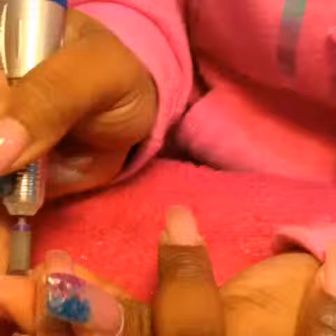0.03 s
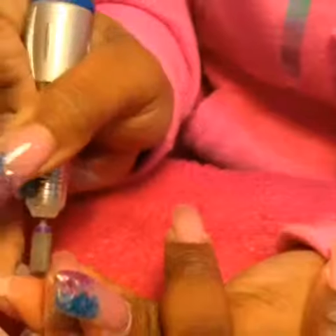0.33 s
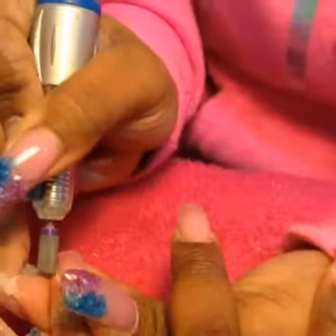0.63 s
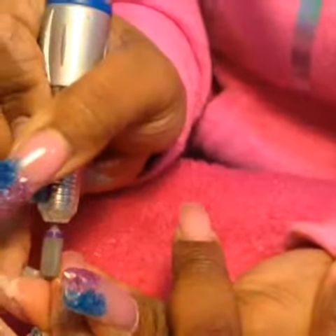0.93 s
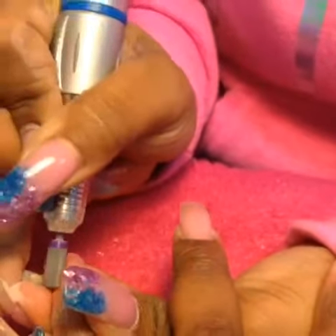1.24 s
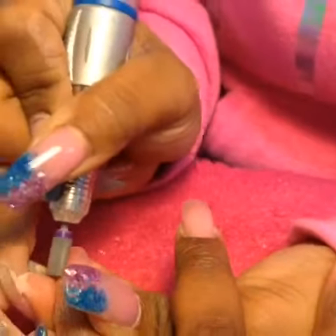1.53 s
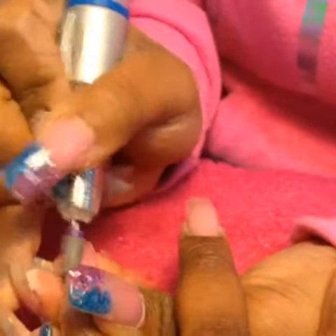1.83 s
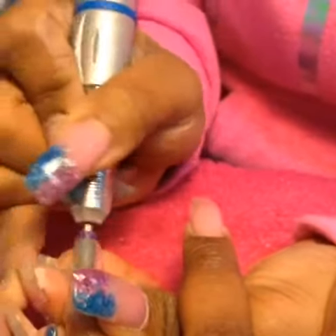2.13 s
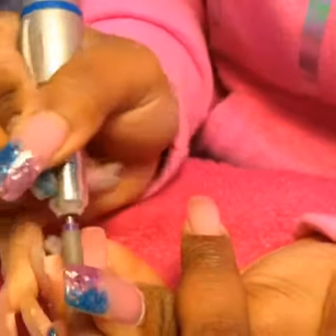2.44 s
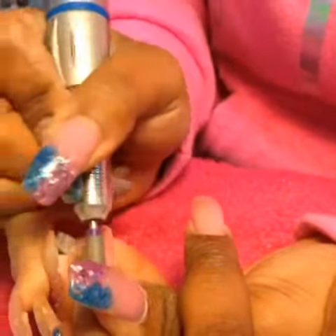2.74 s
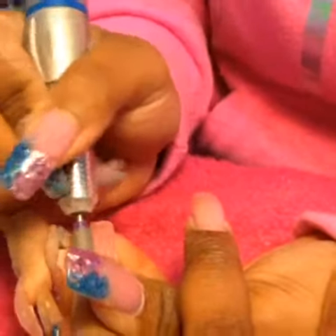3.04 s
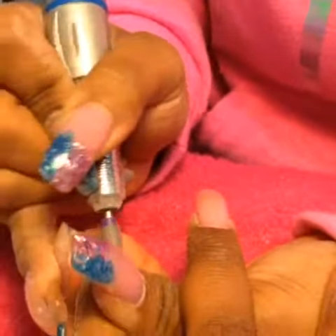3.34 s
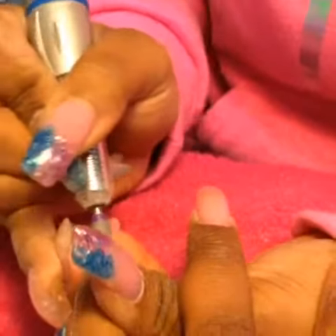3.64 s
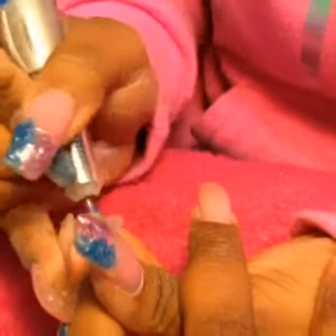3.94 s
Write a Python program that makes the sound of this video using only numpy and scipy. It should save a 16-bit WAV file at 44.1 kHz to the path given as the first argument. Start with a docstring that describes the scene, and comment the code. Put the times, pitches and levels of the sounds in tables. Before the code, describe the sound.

An electric nail drill runs with a high whine close by, then grinds a fingernail in six short, raspy strokes. The motor dips in pitch with each stroke and recovers between them, over a faint room hum.

```python
"""After a moment of silence, an electric nail drill is heard running free, close by, over a low room hum;
its bearings excite the resonances of the handpiece into a whine. Hands rustle now and then. From 0.8 s
the bit is pressed on a fingernail six times: the motor sags under the load, the bit buzzes once per
turn, and its teeth squeal and scrape off dust. Between strokes the speed recovers. Near the middle the
whine flares briefly three times, and the bit knocks as it lands for the third stroke."""
import sys
import numpy as np
from scipy import signal
from scipy.fft import rfft, irfft
from scipy.io import wavfile
from scipy.ndimage import uniform_filter1d

SR = 44100
rng = np.random.default_rng(int(sys.argv[2]) if len(sys.argv) > 2 else 0)


def put_to_file(sound):
    """Save the sound as 16-bit audio at rate SR, in the file named by the first command-line argument."""
    columns = np.atleast_2d(sound).T  # one column per channel
    safe = np.clip(columns, -1, 1)
    whole_steps = np.round(safe * 32767)
    wavfile.write(sys.argv[1], SR, whole_steps.astype(np.int16))


N = 176400
T = np.arange(N) / SR

# Envelopes, one table per stroke on the nail: t/s, then relative level/dB of buzz, rasp and dust
STROKE_LEVELS = [
    [(0.82, -74, -98, -69), (0.876, -65, -45, -52.5), (0.98, -78, -43.5, -46), (1.108, -65, -49.5, -44.5),
     (1.202, -55.5, -45, -52.5), (1.26, -51, -44.5, -46), (1.38, -55.5, -47, -49), (1.404, -72, -46.5, -57),
     (1.43, -77, -74, -47)],
    [(1.565, -74, -68, -43), (1.585, -53.5, -38, -48), (1.623, -48, -43.5, -49), (1.661, -51.5, -46, -46.5),
     (1.747, -55, -43, -43.5), (1.821, -45.5, -41, -51), (1.883, -55, -50, -59), (1.933, -46.5, -47, -62),
     (1.97, -82, -61, -71)],
    [(2.095, -80, -65, -49), (2.115, -46, -37, -49.5), (2.187, -44, -38.5, -47), (2.237, -52, -37, -46),
     (2.263, -45.5, -52, -47.5), (2.331, -49.5, -40, -44), (2.339, -45, -47, -40), (2.357, -58, -48, -51),
     (2.385, -56, -59, -60)],
    [(2.695, -72, -55, -60), (2.717, -59, -39.5, -47), (2.793, -58.5, -47, -40.5),
     (2.843, -59.5, -39, -43.5), (2.923, -58.5, -41, -40.5), (2.949, -59, -37, -42.5),
     (2.977, -60, -38, -46), (3.003, -58, -41.5, -48), (3.03, -84, -58, -73)],
    [(3.17, -85, -65, -51), (3.194, -60, -43, -45.5), (3.284, -53, -38.5, -39.5),
     (3.39, -57.5, -43.5, -40.5), (3.436, -54, -36, -37.5), (3.486, -50.5, -44, -44), (3.5, -60, -50, -51),
     (3.566, -50, -38, -45), (3.61, -77, -75, -63)],
    [(3.68, -80, -70, -59), (3.696, -53, -35, -46), (3.742, -55.5, -43.5, -40), (3.812, -49.5, -48, -41.5),
     (3.878, -57, -48.5, -47.5), (3.936, -70, -55, -47), (3.958, -58, -45.5, -48), (3.968, -86, -96, -66),
     (3.98, -82, -67, -68)],
]
# Frequency response of the rasping nail: f/Hz, level/dB
NAIL_RESPONSE = [(1200, -30.5), (1950, -15.5), (2200, -2), (2420, 1.5), (2640, -12.5), (2900, -16),
                 (3300, -4.5), (3700, -8), (4500, -10.5), (6000, -22), (9000, -45)]


def amp(db):
    """Amplitude ratio of a level in decibels."""
    return 10 ** (np.asarray(db) / 20)


def unit(x):
    """Normalisation to an rms of 1."""
    return x / np.sqrt(np.mean(x ** 2) + 1e-20)


def noise():
    """Gaussian white noise."""
    return rng.standard_normal(N)


def drift(hz):
    """Low-pass noise: random motion slower than hz, with an rms of 1."""
    rolloff = 1 + (np.fft.rfftfreq(N, 1 / SR) / hz) ** 4
    return unit(irfft(rfft(noise()) / rolloff, N))


def swell(at, width):
    """Gaussian envelope: a smooth rise and fall."""
    return np.exp(-.5 * ((T - at) / width) ** 2)


def colour(x, response):
    """Forced vibration: x drives a minimum-phase body with the given response (f/Hz, level/dB)."""
    f, db = np.transpose(response)
    bin_hz = abs(np.fft.fftfreq(4096, 1 / SR))
    log_gain = np.log(amp(np.interp(np.log(bin_hz + 1), np.log(f), db)))
    impulse_response = np.fft.ifft(np.exp(np.conj(signal.hilbert(log_gain)))).real[:2048]
    return signal.fftconvolve(x, impulse_response)[:N]


def ringing(x, t60_s=.06, tail_share=.55):
    """Modal overlap: many small resonances of tool, hand and table merge into a short decaying tail."""
    t = np.arange(1, 3000) / SR
    tail = rng.standard_normal(len(t)) * amp(-60 * t / t60_s)
    tail *= np.sqrt(tail_share) / np.linalg.norm(tail)
    return signal.fftconvolve(x, np.r_[np.sqrt(1 - tail_share), tail])[:N]


def whine(angle, loaded):
    """Forced resonance: bearing tones and rolling noise drive the handpiece; load adds rattle."""
    # Bearing tones: multiple of the shaft speed, relative level/dB
    bearings = [(9.875, -4.5), (13.17, -2), (16.47, -2.5), (19.75, -10.5), (29.25, -12), (35.85, -0.5),
                (36.39, -20), (41.65, -2.5), (46.14, 1.5), (55.64, 0.5), (61.19, 3), (64.98, 4.5),
                (65.82, 4.5), (66.31, -3), (69.72, -1), (75.22, -3.5)]
    # Resonances of the handpiece: f/Hz, level/dB
    handpiece = [(100, -33), (700, -26), (1300, -20.5), (1900, -21.5), (2300, -13), (2750, -26),
                 (3600, -17), (4500, -13), (5100, -6.5), (5600, -7.5), (5880, -1), (6300, -17), (6900, -12),
                 (7600, -8.5), (8100, 3), (8450, 7.5), (8750, 5), (9300, -6), (10500, -12.5), (12500, -21),
                 (15500, -21.5)]
    # Further colouring while the bit runs free: f/Hz, level/dB
    free_run = [(100, -14), (4000, 2), (6000, 0), (7300, 6.5), (7900, -0.5), (8130, -8), (8300, -2),
                (8440, 0), (8640, -17), (9000, -1), (9350, -1.5), (10400, 3), (11500, 4.5), (13000, 4.5),
                (15500, 3)]
    # Envelope of the whine: t/s, relative level/dB
    envelope = [(0.13, -39), (0.86, -38), (1.28, -42.5), (2.19, -39.5), (2.4, -39.5), (2.41, -40.5),
                (2.43, -39.5), (2.68, -39), (2.75, -38), (2.95, -39.5), (2.97, -35), (3.02, -40.5),
                (3.43, -39.5), (3.45, -41.5), (3.72, -39), (3.75, -36), (3.89, -40.5), (4.0, -38.5)]
    tones = sum(amp(db - 7.5) * np.cos(k * angle + rng.uniform(0, 2 * np.pi)) for k, db in bearings)
    orders = np.arange(16, 140, .9) + rng.random(138)  # dense inharmonic partials
    partials = sum(amp(rng.uniform(-11.5, 11.5)) * np.cos(k * (angle + 99 * rng.random()))
                   for k in orders)
    rolling = ringing(noise()) * amp(10.5 - 3 * loaded)
    drive = tones * amp(1 - 2.8 * loaded) + unit(partials) * amp(3 - 6.1 * loaded) + rolling
    rattle = np.exp(.23 * (.12 + .19 * loaded) * drift(hz=119))
    body = colour(drive * rattle, handpiece)
    body = loaded * body + (1 - loaded) * colour(body, free_run)
    body /= np.sqrt(uniform_filter1d(body ** 2, size=4000))  # the envelope alone sets the level
    return body * amp(1 + np.interp(T, *np.transpose(envelope)))


def room(noise_db=-63.5):
    """Superposition: steady hum and low room noise add to the swelling rustle of hands."""
    # Tones of the hum: f/Hz, rms level/dB
    hum_tones = [(119, -67.5), (360.3, -69)]
    # Spectrum of the room noise: f/Hz, relative level/dB
    room_spectrum = [(20, -10), (45, -5.5), (110, 2), (170, 3.5), (300, -2.5), (450, -14), (900, -14.5),
                     (3000, -33), (16000, -62)]
    # Hands and towel shifting: t/s, Gaussian width/s, level/dB
    rustles = [(0.482, 0.19, -61), (.97, 0.085, -55.5), (2.332, .05, -64), (2.407, 0.021, -57),
               (3.45, 0.035, -64)]
    # Spectrum of the rustle: f/Hz, relative level/dB
    rustle_spectrum = [(40, -52), (120, -7), (300, -1.5), (500, -12), (800, -13), (1500, -23), (5000, -38)]
    hum = sum(amp(db) * np.sqrt(2) * np.sin(2 * np.pi * (hz * T + rng.random())) for hz, db in hum_tones)
    movement = sum(amp(db) * swell(at, width) for at, width, db in rustles)
    hands = movement * unit(colour(noise(), rustle_spectrum))
    return amp(noise_db) * unit(colour(noise(), room_spectrum)) + hum + hands


def scrape(angle, grit, depth, flutes=9, flute_db=10.5):
    """Periodic excitation: the same teeth pass on every turn, giving shaft harmonics and pulsed grit."""
    knots_s = np.arange(0, T[-1] + .1, .06)
    buzz = np.zeros(N)
    for k in range(1, 50):
        # each harmonic wanders as the contact shifts; the one at the flute rate is boosted
        strength = np.interp(T, knots_s, np.exp(.6 * rng.standard_normal(len(knots_s))))
        buzz += amp(flute_db * (k == flutes)) * strength * np.cos(k * angle + 2 * np.pi * rng.random())
    return unit(buzz) + grit * unit(noise() * np.exp(depth * np.cos(angle)))


def grinding(angle):
    """Abrasion as source and filter: each stroke drives a low buzz, a nail rasp and a hiss of dust."""
    # Frequency response shaping the low buzz: f/Hz, level/dB
    buzz_response = [(60, -22), (110, 2), (200, -11.5), (500, -15), (680, -13), (830, 0), (1030, 2),
                     (1270, -1), (1420, 1.5), (1650, 5), (1900, -0.5), (2300, -49), (3500, -37)]
    # Spectrum of the dust hiss: f/Hz, relative level/dB
    dust_spectrum = [(1000, -20.5), (2600, -3), (3400, 1.5), (4500, 3), (5700, 3), (6500, 7.5), (7500, 1.5),
                     (8500, -4), (10000, 2.5), (11700, 2), (13400, 9.5), (14200, 4.5), (15500, -20)]
    gains = np.zeros((3, N))
    for stroke in STROKE_LEVELS:
        times, *levels = np.transpose(stroke)
        contact = np.clip(np.minimum(T - times[0], times[-1] - T) / .018, 0, 1)  # 18 ms ramps
        gains += [contact * amp(np.interp(T, times, db)) for db in levels]
    buzz_gain, rasp_gain, dust_gain = gains
    buzz = unit(colour(scrape(angle, grit=.35, depth=.27), buzz_response))
    rasp = unit(colour(ringing(scrape(angle, grit=.5, depth=.24)), NAIL_RESPONSE))
    rasp *= amp(1.7 * drift(hz=39.6))  # the level flickers
    puffs = noise() * np.exp(.32 * np.cos(angle) + .058 * drift(hz=600))  # one per turn
    dust = unit(colour(ringing(puffs), dust_spectrum))
    return buzz_gain * buzz + rasp_gain * amp(-1) * rasp + dust_gain * amp(3.5) * dust


def squeals(angle):
    """Modulation: catching teeth sing rough tones, with sidebands spaced by the shaft frequency."""
    # Teeth catching: t/s, Gaussian width/s, multiple of the shaft speed, relative level/dB
    catches = [(.99, .035, 18, -42), (1.05, .07, 36, -41), (1.33, .07, 36, -51), (1.74, .07, 36, -43),
               (1.74, .04, 23, -45), (1.91, .025, 27, -47), (2.73, .03, 36, -44), (2.24, .06, 27, -47),
               (2.32, .06, 36, -44), (2.79, .08, 27, -44), (2.965, .022, 27, -35), (2.88, .1, 36, -40),
               (2.86, .08, 63, -47), (3.38, .06, 36, -39), (3.435, .025, 27, -41), (3.29, .07, 63, -42),
               (3.78, .07, 36, -38)]
    pressed = sum(1. * ((T > stroke[0][0] + .015) & (T < stroke[-1][0] - .025))
                  for stroke in STROKE_LEVELS)
    contact = uniform_filter1d(pressed, size=400)
    sidebands = 1 + .6 * np.cos(angle) + .35j * np.sin(angle) + .3j * np.sin(2 * angle)
    out = np.zeros(N)
    for at, width, order, db in catches:
        flutter = 1 + .012 * order * (drift(hz=60) + 1j * drift(hz=60))  # higher tones flutter more
        tone = unit((flutter * sidebands * np.exp(1j * order * angle)).real)
        out += amp(db + 1.5) * swell(at, width) * tone
    return contact * out


def flares():
    """Resonance: the handpiece rings out briefly in narrow bands of noise near its main peak."""
    # Flares of the whine: t/s, Gaussian width/s, f/Hz, level/dB
    bursts = [(1.86, .04, 8750, -43), (2.415, 0.0056, 8400, -34), (2.57, 0.056, 8020, -46)]
    return sum(amp(db) * swell(at, width) * np.sqrt(2) * drift(hz=110) * np.cos(2 * np.pi * hz * T)
               for at, width, hz, db in bursts)


def knocks(decay_s=.0012):
    """Impact excitation: the landing bit chatters, and each short burst rings the nail."""
    # Impacts of the bit: t/s, peak level/dB
    impacts = [(2.116, -26.5), (2.124, -27), (2.132, -26.5)]
    out = np.zeros(N)
    for at, db in impacts:
        burst = noise() * (T > at) * np.exp(-abs(T - at) / decay_s)
        knock = colour(burst, NAIL_RESPONSE)
        out += amp(db) * knock / abs(knock).max()
    return out


def scene(first_load_s=.99):
    """Phase locking: one shaft angle, the integral of its speed, drives whine, grinding and squeals."""
    # Rotation frequency of the shaft, sagging at each stroke: t/s, f/Hz
    shaft_speed = [(0.0, 128.1), (0.8, 128.1), (0.88, 126.8), (0.97, 123.8), (1.05, 116.4), (1.13, 111.3),
                   (1.23, 105.4), (1.35, 94.8), (1.4, 92.9), (1.5, 106.0), (1.58, 112.7), (1.63, 112.5),
                   (1.69, 107.3), (1.78, 92.7), (1.89, 89.3), (1.95, 92.0), (2.04, 106.0), (2.11, 112.3),
                   (2.24, 107.0), (2.34, 99.4), (2.38, 102.7), (2.47, 113.5), (2.56, 120.0), (2.65, 121.5),
                   (2.7, 118.3), (2.8, 111.2), (2.88, 100.4), (2.96, 86.3), (3.01, 90.3), (3.1, 103.0),
                   (3.19, 110.5), (3.28, 106.5), (3.37, 98.4), (3.42, 91.0), (3.5, 87.2), (3.58, 92.3),
                   (3.69, 111.8), (3.75, 113.0), (3.82, 109.3), (3.9, 100.6), (3.95, 101.4), (4.0, 107.0)]
    loaded = np.clip((T - first_load_s) / .11 + .5, 0, 1)  # rises in the first stroke and stays at 1
    speed_hz = np.interp(T, *np.transpose(shaft_speed))
    wobble_hz = drift(hz=35.64) * (.079 + .47 * loaded)
    angle = 2 * np.pi * np.cumsum(speed_hz + wobble_hz) / SR
    return (whine(angle, loaded) + grinding(angle) + squeals(angle) + knocks() + flares() + room())[None]


def record(dry, start_s=.12, cutoff_hz=15450):
    """Gating and band limiting: the sound cuts in after a moment of silence and is low-pass filtered."""
    lowpass = signal.firwin(511, cutoff_hz, window=("kaiser", 9), fs=SR)
    return signal.oaconvolve(dry * (T > start_s), lowpass[None], "same")


dry = scene()
out = record(dry)
put_to_file(out)
```